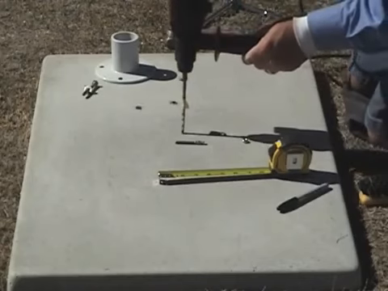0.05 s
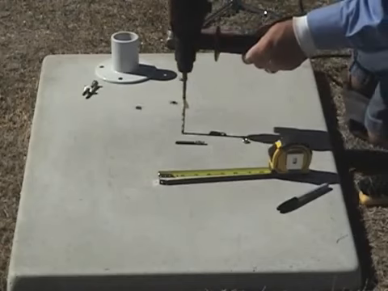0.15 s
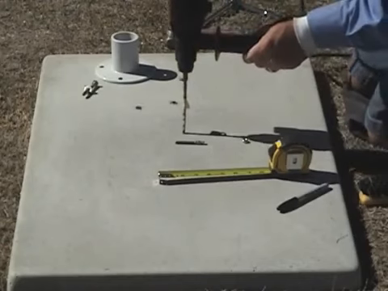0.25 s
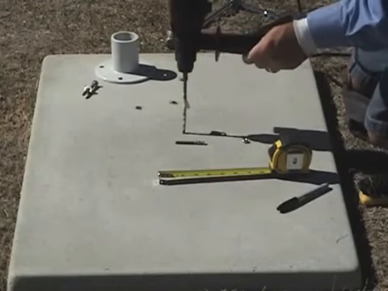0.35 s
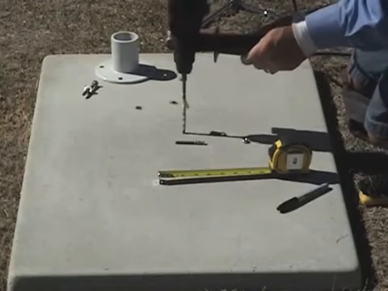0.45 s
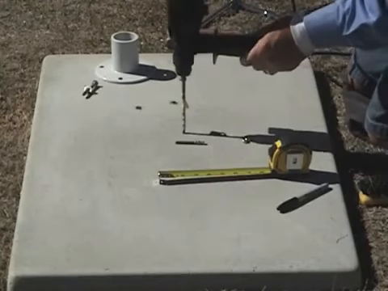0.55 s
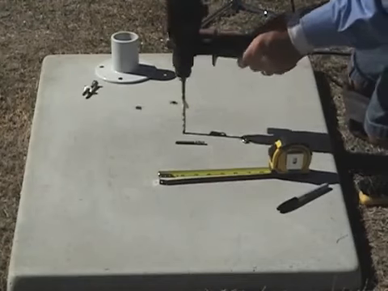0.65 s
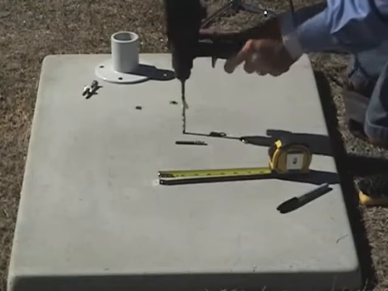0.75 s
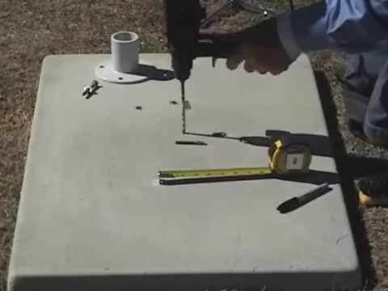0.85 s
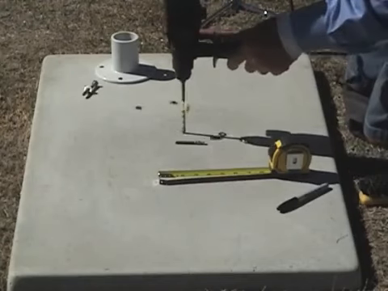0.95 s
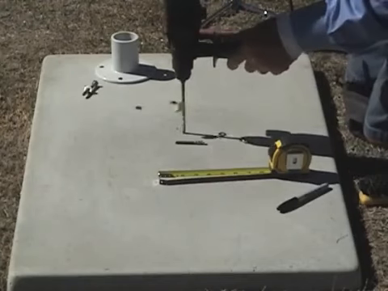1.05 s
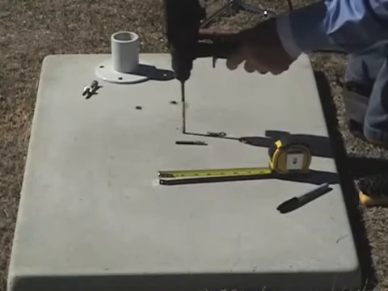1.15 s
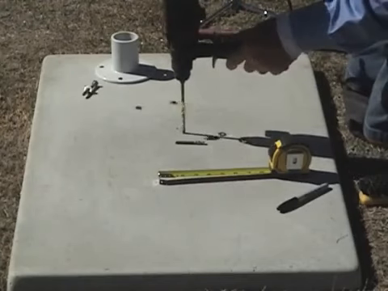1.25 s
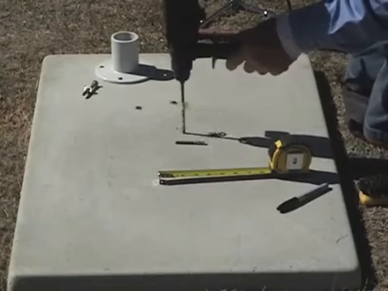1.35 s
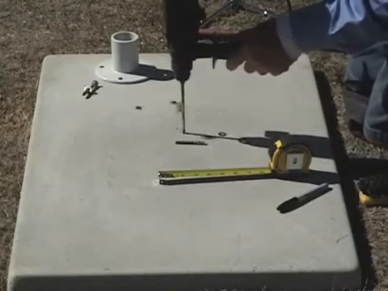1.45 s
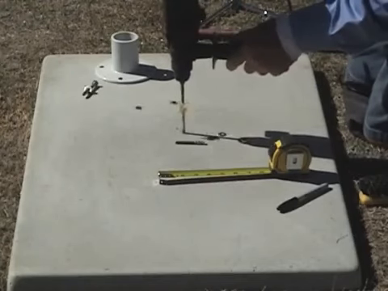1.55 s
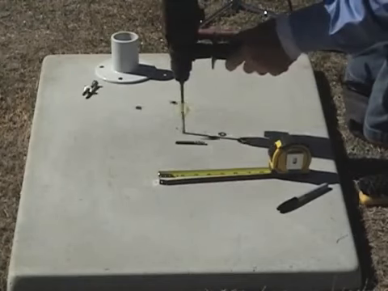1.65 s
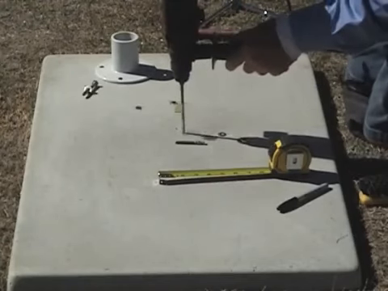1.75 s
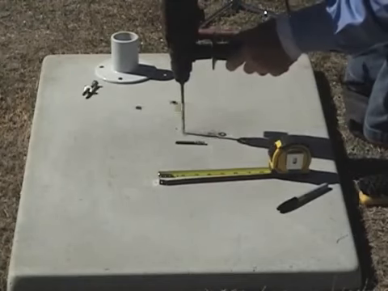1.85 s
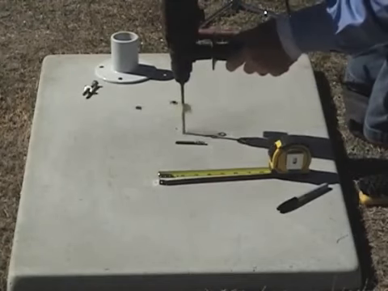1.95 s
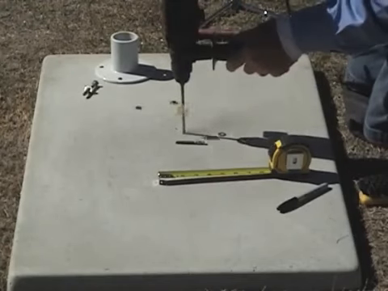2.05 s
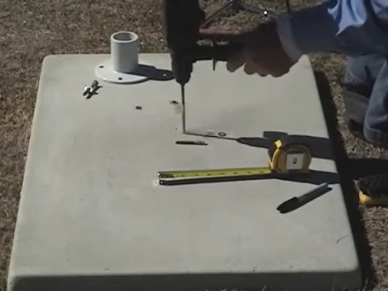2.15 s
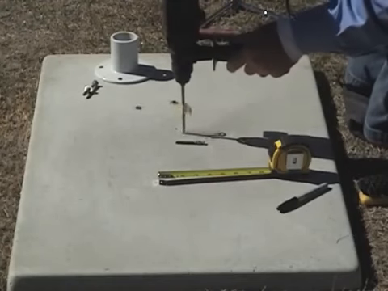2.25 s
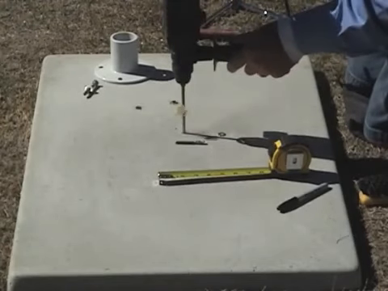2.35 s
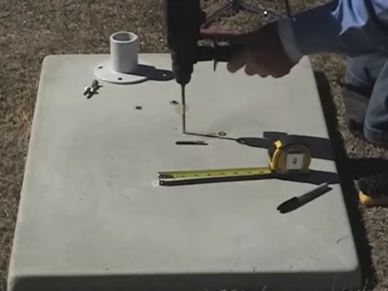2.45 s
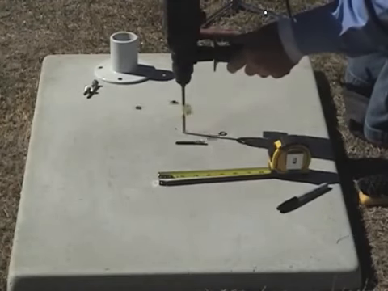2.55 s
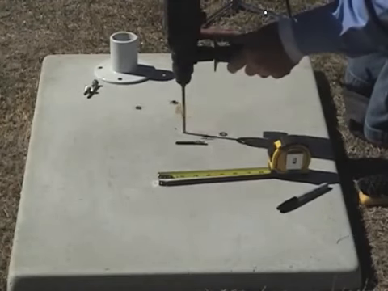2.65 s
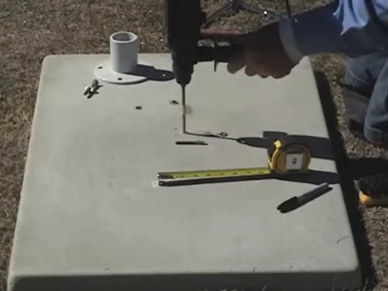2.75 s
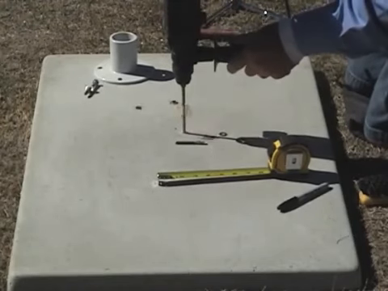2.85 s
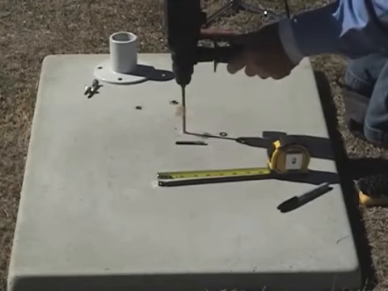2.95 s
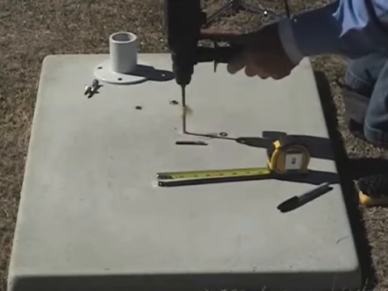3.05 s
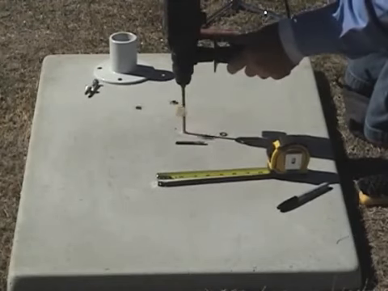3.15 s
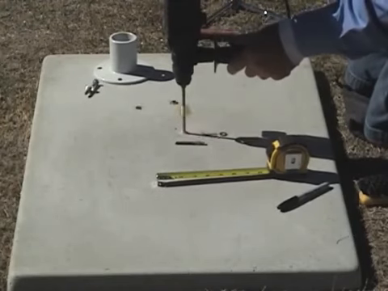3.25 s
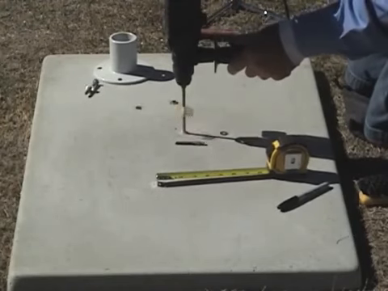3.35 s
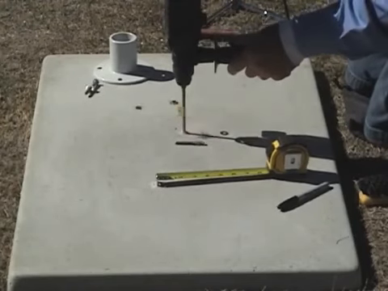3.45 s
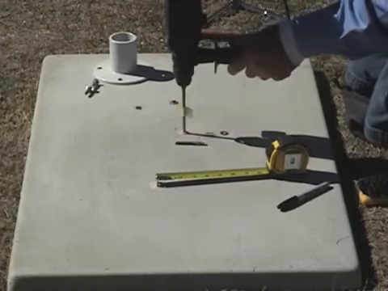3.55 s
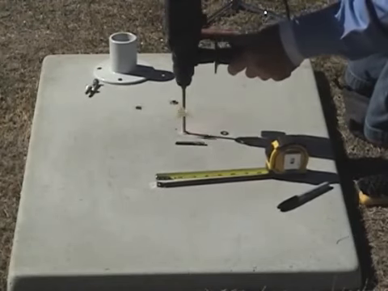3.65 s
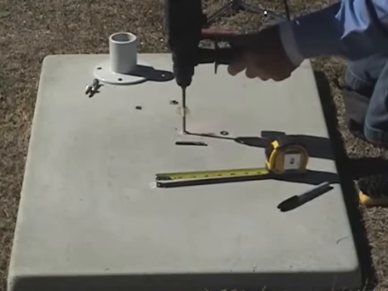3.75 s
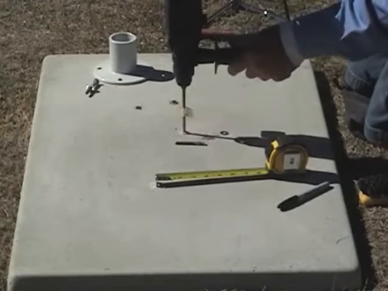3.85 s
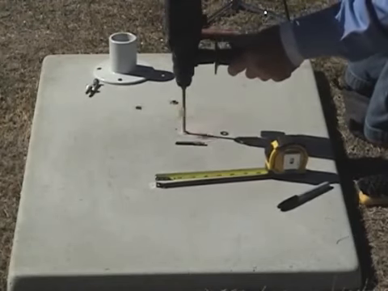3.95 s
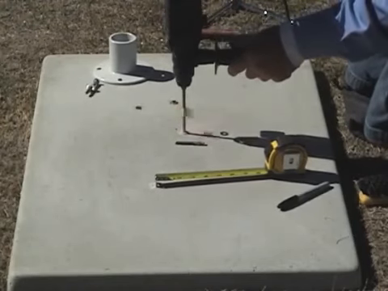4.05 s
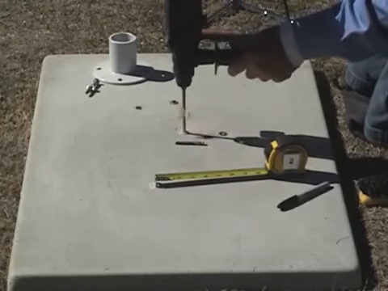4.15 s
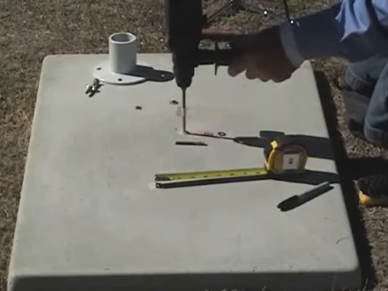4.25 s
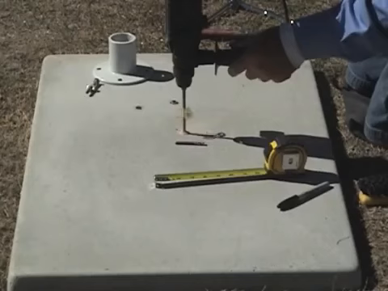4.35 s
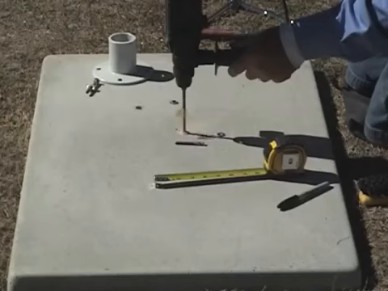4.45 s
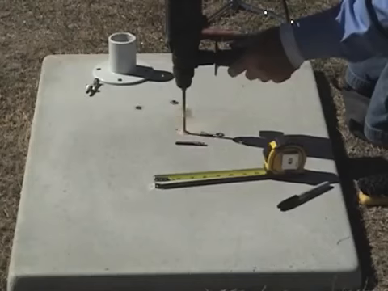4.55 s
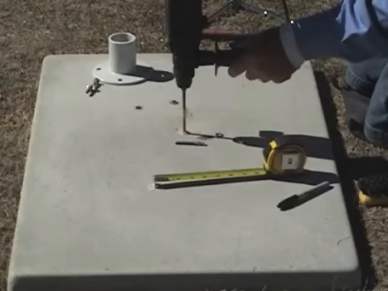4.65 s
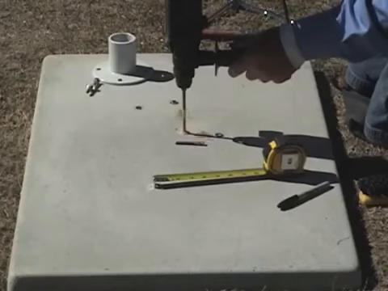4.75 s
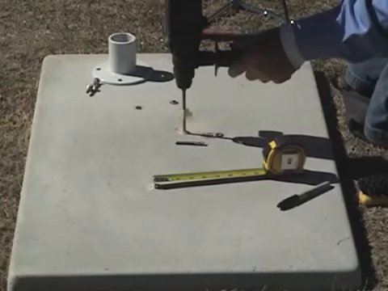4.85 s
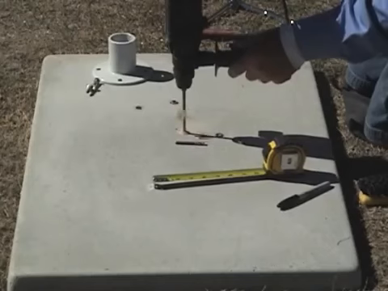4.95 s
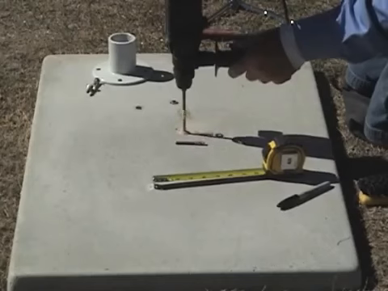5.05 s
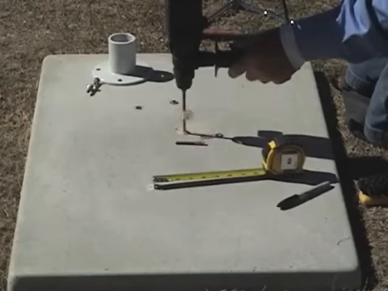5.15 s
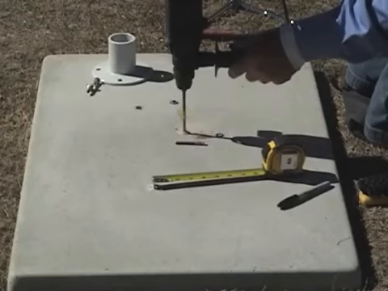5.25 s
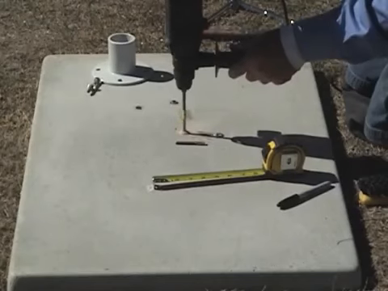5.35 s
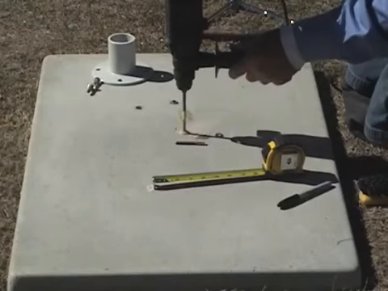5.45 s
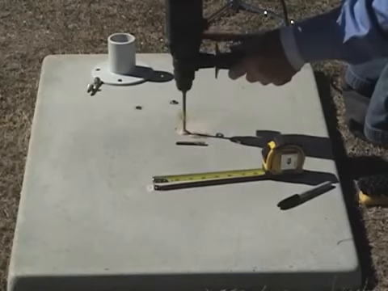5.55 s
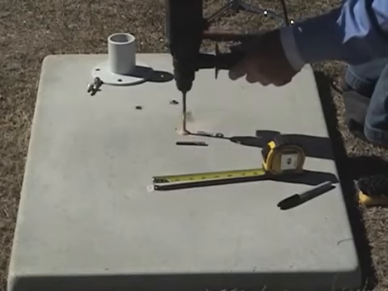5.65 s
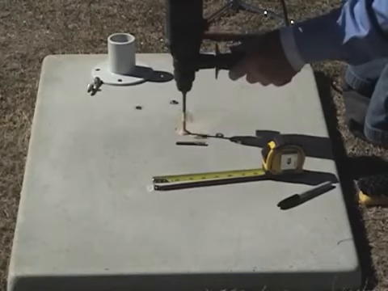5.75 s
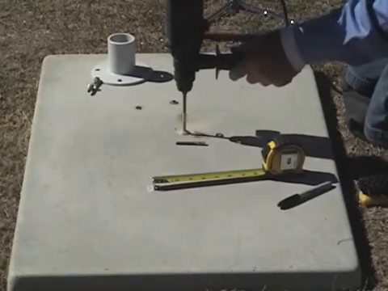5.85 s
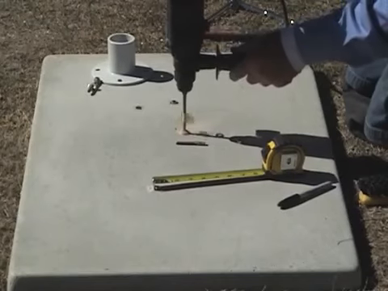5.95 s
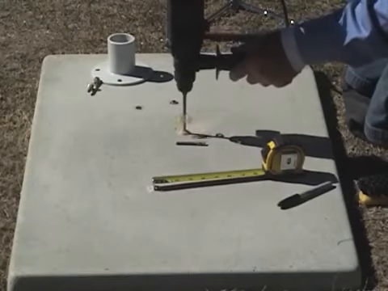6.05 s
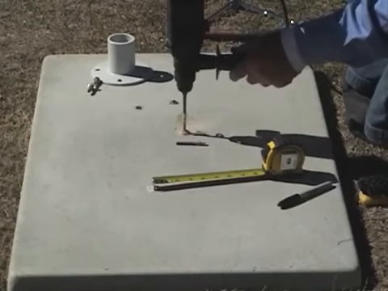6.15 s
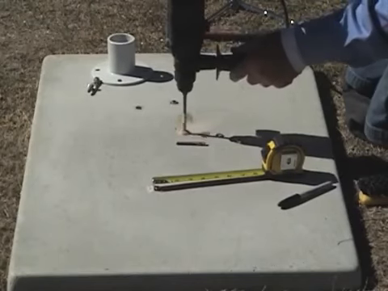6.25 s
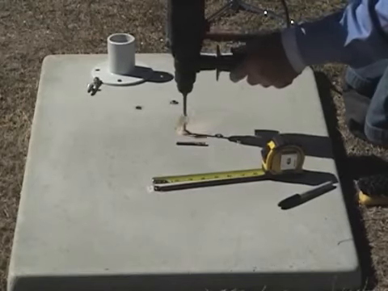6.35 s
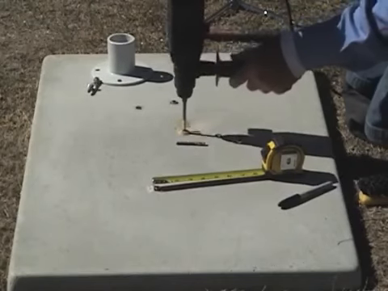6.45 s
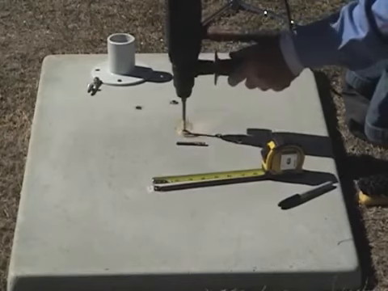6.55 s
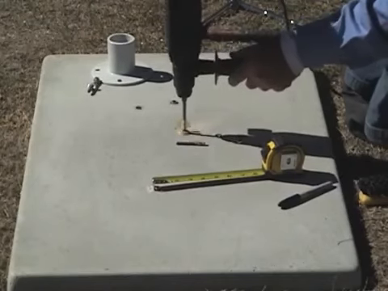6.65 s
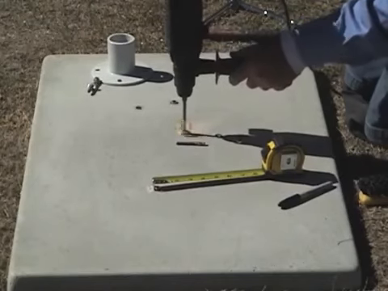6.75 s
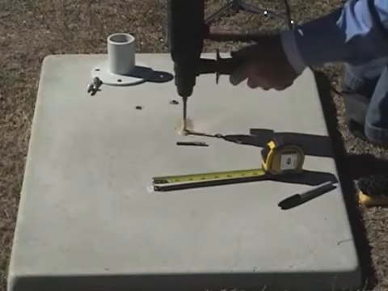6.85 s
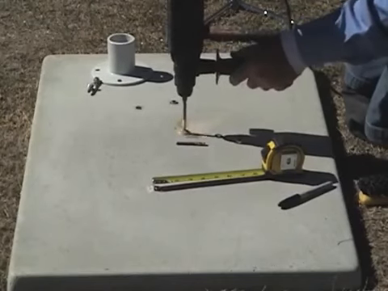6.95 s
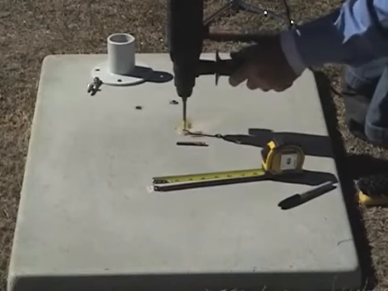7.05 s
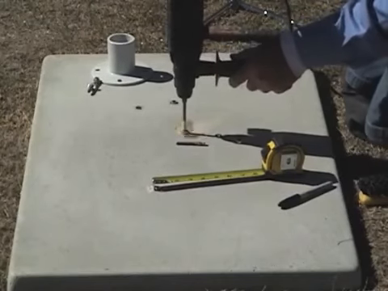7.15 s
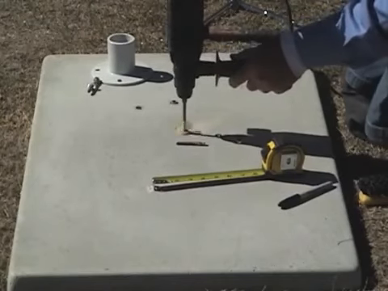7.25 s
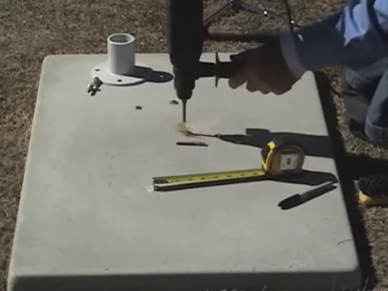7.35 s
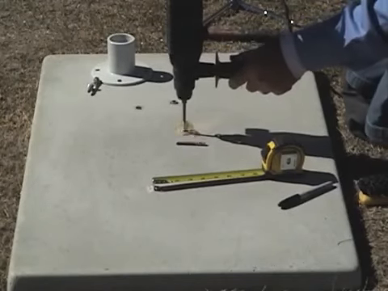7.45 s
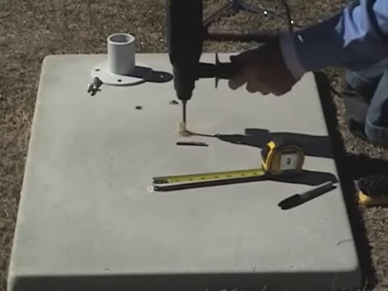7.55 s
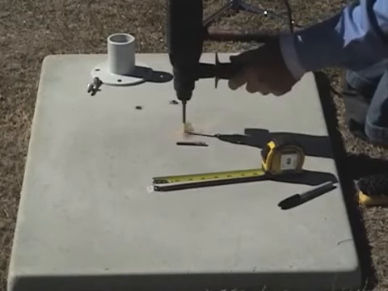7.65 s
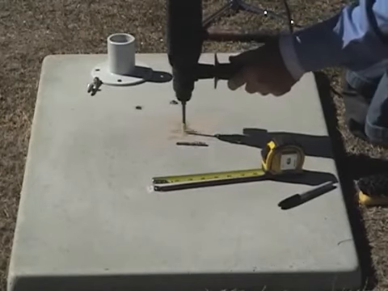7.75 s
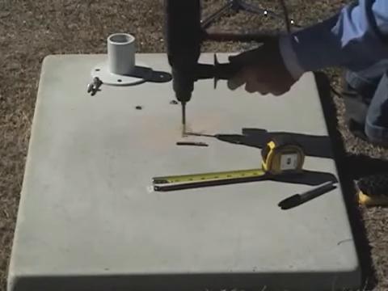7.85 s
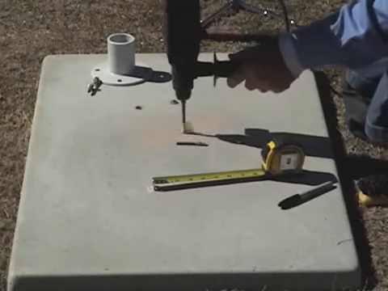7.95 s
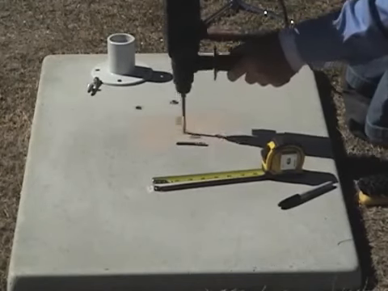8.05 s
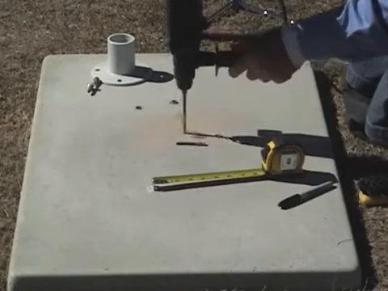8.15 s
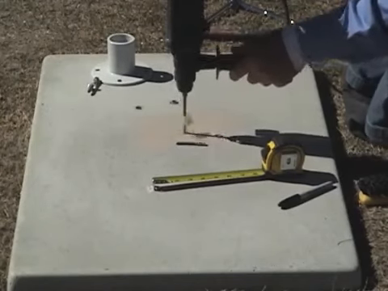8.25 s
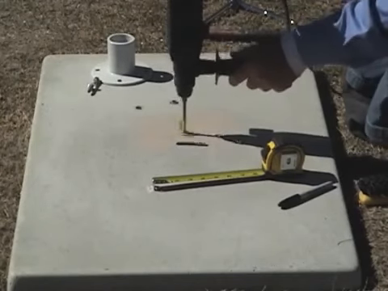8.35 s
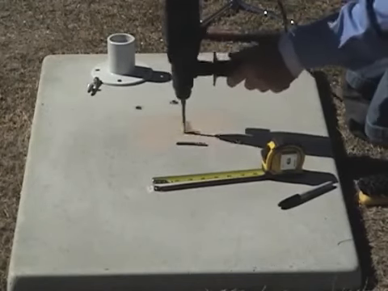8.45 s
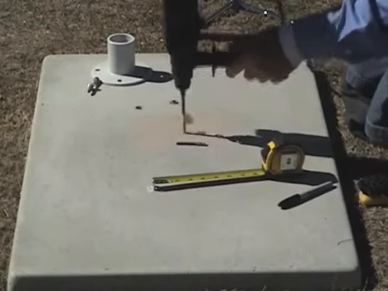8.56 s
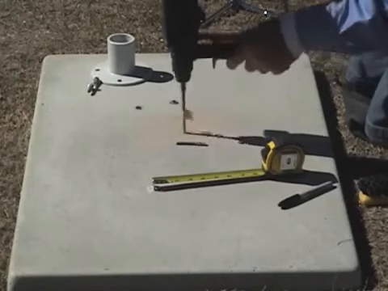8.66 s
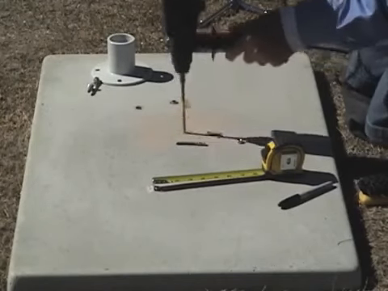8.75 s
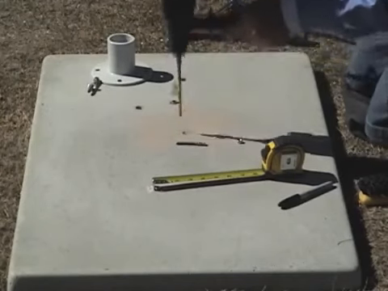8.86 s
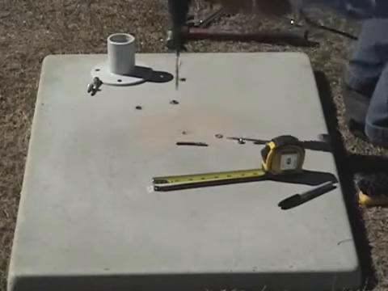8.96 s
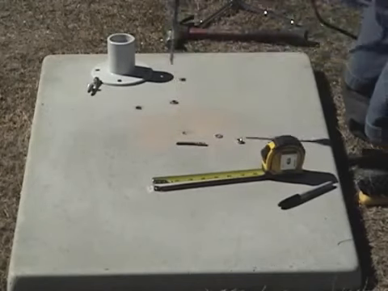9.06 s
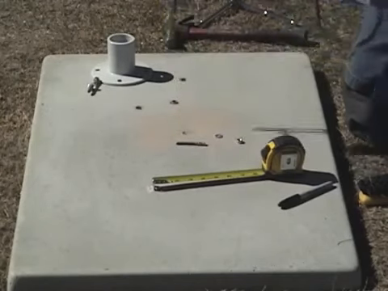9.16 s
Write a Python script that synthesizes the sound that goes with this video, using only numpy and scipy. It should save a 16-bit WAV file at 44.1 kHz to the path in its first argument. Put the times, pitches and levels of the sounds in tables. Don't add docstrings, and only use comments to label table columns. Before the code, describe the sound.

Quiet open air, a click, a few separate knocks, then harsh machine-gun hammering on ringing concrete, ending in a whirring, slowing motor.

```python
import sys
import numpy as np
from scipy import signal
from scipy.fft import rfft, irfft, next_fast_len
from scipy.io import wavfile
from scipy.ndimage import uniform_filter1d

SR = 44100
rng = np.random.default_rng(int(sys.argv[2]) if len(sys.argv) > 2 else 0)


def natural_amplitude(level_db):
    exponent = np.asarray(level_db, float) / 20
    return 10 ** exponent


def generate_wav(sig):
    pcm = np.round(np.clip(np.atleast_2d(sig).T, -1, 1) * 32767).astype(np.int16)
    wavfile.write(sys.argv[1], SR, pcm)


N = 406513
TIME = np.arange(N) / SR
OPPOSITE = np.array([[1], [-1]])

# (time [s], peak [dB], steel crack re peak [dB])
SINGLE_BLOWS = [
    (1.029, -29, -15),
    (1.093, -21, -15),
    (1.12, -5.5, -11),
    (1.187, -10.5, -13),
    (1.268, -15.5, -9),
]
# (time [s], peak [dB])
SET_DOWN = [
    (.105, -34.5),
    (.8855, -21.5),
    (0.8898, -32.5),
    (.902, -33),
    (.911, -34),
]
# (time [s], blow peak [dB], slab thrum re blow [dB])
PRESSURE = [(1.338, -7.5, -7), (1.375, -5, -7), (1.66, -3.5, -9), (1.88, -3.5, -1.5), (2.0, -4, -11),
            (2.35, -3.5, -2.5), (2.6, -2.5, -2), (3.36, -3, -8), (5.15, -3.5, -4.5), (6.5, -3.5, 0)]
# (start [s], end [s])
LIMPING_SPELLS = [
    (2.5, 3.55),
    (4.0, 5.08),
]
# (delay after the blow [ms], level [dB])
CHATTER = [(-3.5, -11), (-2, -8.5), (-0.94, -7), (.8, -3.5), (1.9, -8.5), (4, -9.5), (7.5, -14)]
# (frequency [Hz], t60 [s])
SLAB_THRUM = (158.25, 0.26)
# (frequency [Hz], level [dB], t60 [s])
DEEP_MODES = [(224, -24, .05), (437, -25.5, 0.027), (443.3, -8.5, 0.04), (666, -18, 0.069),
              (792.7, 5, 0.05), (955, -8, 0.028)]
HIGH_MODES = [(1067, -9, 0.016), (1300, -6, 0.037), (1387, -5, 0.033), (1673, -13, 0.03),
              (1838, -6.5, 0.038), (2044, -8.5, 0.027), (2307, -4, 0.013), (2462, -9.5, 0.014),
              (2606, -10, 0.024), (3420, -24.5, 0.014), (3870, -16, 0.012), (4153, -9, 0.011),
              (5500, -33, 0.0082)]
LOOSE_MODES = [(466, -7, .04), (817, 2, .07), (1309, -6, .07), (1411, -9, .06)]
# (frequency [Hz], level [dB])
RADIATION = [(150, -19.5), (230, -6), (306, -6), (385, 2), (460, 2), (540, -5.5), (615, -1), (850, 1),
             (1000, -15.5), (1200, -0.5)]
# (frequency [Hz], width [Hz], level [dB])
STEEL_MODES = [(6670, 260, 1), (7430, 720, 3.5), (8820, 460, 1.5)]

# (time [s], speed [teeth/s])
PICKUP = [
    (1.02, 4),
    (1.1, 14),
    (1.25, 14),
    (1.338, 28.8),
    (1.575, 28.8),
    (1.6, 35),
    (1.73, 47),
    (1.84, 53.3),
]
# (time [s], speed [teeth/s])
LOADED_SPEED = [(2.45, 74.9), (2.75, 76.2), (3.46, 77.4), (4.26, 77.3), (4.34, 76.8), (5.05, 76.9),
                (5.49, 75.2), (5.86, 74.6), (6.26, 75.5), (6.56, 74.6)]
ENGAGE_S, SEATED_S, LIFT_S, RELEASE_S = 1.338, 2.0, 6.56, 8.53
FREE_HZ = 88.4

# (time [s], level [dB])
WHIR = [(1.018, -85), (1.03, -41), (1.1, -28.5), (1.19, -30.5), (1.27, -37.5), (1.36, -23.5), (1.5, -24.5),
        (6.56, -25.5), (6.63, -26), (6.85, -21.5), (8.12, -21), (8.25, -20.5), (8.55, -22), (8.92, -28),
        (9.22, -31)]
# (frequency [Hz], width [Hz], level [dB])
HOUSING_MODES = [(688, 16, 3), (930, 140, 0), (1420, 120, -8), (1900, 200, 2), (2290, 100, -1),
                 (2970, 330, -2), (4400, 260, -3), (5560, 440, -12), (8060, 500, -15)]
# (frequency [Hz], density [dB/Hz])
HOUSING_WASH = [(120, -17), (283, -12), (680, -8), (1200, -9.5), (1930, -1.5), (2900, -5), (3700, -5),
                (4450, -11.5), (5200, -12), (10300, -24.5)]
# (time [s], level re whir [dB])
SQUEALS = [
    (6.46, -7),
    (8.27, -4),
    (8.47, -7),
    (8.83, -1),
]
# (time [s], level [dB], frequency [Hz], t60 [s])
SWITCH = (.8752, -30, 2600, .018)
# (frequency [Hz], side minus mid [dB])
ECHO_SPREAD = [(60, -9), (110, -44), (190, -66.5), (340, -41), (610, -21.5), (1090, -22.5), (1940, -18),
               (3460, -16.5), (6170, -24), (11000, -12)]
# (frequency [Hz], density [dB/Hz])
AIR = [(15, -46), (25, -35.5), (103, -3.5), (136, -5), (220, -5), (262, -15.5), (905, -11.5), (1700, -23),
       (2620, -20.5), (9730, -33), (10500, -39), (13600, -88.5), (22000, -120)]


def hammer():
    s, size, thrum_db, crack_db = blows()
    blow = clicks(s, size)
    push = blow.copy()
    for ms, db in CHATTER:
        late_s = (ms + .03 * rng.standard_normal(len(s))) / 1000
        scatter_db = rng.standard_normal(len(s))
        push += clicks(s + late_s, size * natural_amplitude(db + scatter_db))
    grit = fade(blow, 6.1) * rng.standard_normal(N)
    push += natural_amplitude(-33) * grit
    touch_s, touch_db = np.transpose(SET_DOWN)
    tap = clicks(touch_s, natural_amplitude(touch_db))
    touch = cut(tap, 2600, "low") + natural_amplitude(6.5) * tap
    thrum = mode(clicks(s, size * natural_amplitude(thrum_db)) + natural_amplitude(-1.0) * touch, *SLAB_THRUM)
    slab = ring_slab(blow, push, touch)
    steel = crack_steel(s, size * natural_amplitude(crack_db), tap)
    return natural_amplitude(-7.0) * slab + natural_amplitude(-18.0) * cut(thrum, 130, "high") + natural_amplitude(-0.5) * steel


def blows():
    jitter_ms, limp_late_ms, scatter_db = .025, .25, .6
    even_share, limp_share = .045, .13
    deepest_s, muffle_db_per_s, clear_db_per_s, skate_db = 5.08, 4, 6.5, 5
    db, thrum_db = columns(PRESSURE)
    on = (TIME >= ENGAGE_S) & (TIME < LIFT_S)
    turn = np.cumsum(speed()[on]) / SR
    count = np.arange(int(turn[-1]) + 1)
    s = np.interp(count, turn, TIME[on])
    i = (s * SR).astype(int)
    chance = rng.standard_normal((3, len(s)))
    limping = sum(spell(a, b, .15) for a, b in LIMPING_SPELLS)
    limp = (even_share + (limp_share - even_share) * limping)[i] * (-1.) ** count
    crack_db = -12 - muffle_db_per_s * np.clip(s - SEATED_S, 0, deepest_s - SEATED_S)
    crack_db += clear_db_per_s * np.maximum(s - deepest_s, 0)
    crack_db += (s < SEATED_S) * skate_db * (chance[2] - .5)
    s = s + (jitter_ms * chance[0] + limp_late_ms * limp) / 1000
    size = natural_amplitude(db[i] + scatter_db * chance[1]) * (1 - limp)
    once_s, once_db, once_crack = np.transpose(SINGLE_BLOWS)
    once_thrum = np.full(len(once_s), -7.0)
    return (np.r_[once_s, s], np.r_[natural_amplitude(once_db), size],
            np.r_[once_thrum, thrum_db[i]], np.r_[once_crack, crack_db])


def ring_slab(blow, push, touch):
    loose = spell(-1, SEATED_S, .4)
    free_push = (blow + .5 * touch) * loose
    deep_push = (1 - .7 * loose) * (0.79 * blow + 0.24 * push + touch)
    free = sum(natural_amplitude(db) * mode(free_push, hz, t60) for hz, db, t60 in LOOSE_MODES)
    deep = sum(natural_amplitude(db) * mode(deep_push, hz, t60) for hz, db, t60 in DEEP_MODES)
    high = sum(natural_amplitude(db) * mode(push + touch, hz, t60) for hz, db, t60 in HIGH_MODES)
    return -colour(natural_amplitude(-3.0) * deep + cut(high, 670, "high") + natural_amplitude(-2.0) * free, RADIATION)


def crack_steel(s, size, tap):
    scatter_db = 2.0 * rng.standard_normal(len(s))
    crack = clicks(s - 1.6 / 1000, size * natural_amplitude(scatter_db))
    burst = fade(crack + natural_amplitude(-20.0) * tap, 4.4) * rng.standard_normal(N)
    return sum(natural_amplitude(db) * band(burst, hz, width) for hz, width, db in STEEL_MODES)


def speed():
    full_s, full_hz = PICKUP[-1]
    lag_hz = settle(full_s, LOADED_SPEED[0][1] - full_hz, 0, .125)
    loaded = columns(LOADED_SPEED)[0] - lag_hz
    free = settle(LIFT_S, LOADED_SPEED[-1][1], FREE_HZ, .2)
    coast = settle(RELEASE_S, FREE_HZ, 21, .45)
    stages = [TIME < full_s, TIME < LIFT_S, TIME < RELEASE_S]
    return np.select(stages, [columns(PICKUP)[0], loaded, free], coast)


def settle(s, hz, goal, tau):
    return goal + (hz - goal) * np.exp(-np.maximum(TIME - s, 0) / tau)


def motor():
    hz, free = speed(), spell(LIFT_S, N / SR + 1, 0.51)
    slowed = np.log2(hz / FREE_HZ) * (TIME > RELEASE_S)
    level_db, = columns(WHIR)
    low_db = -3 - 4 * free
    hiss_db = -9 + 4.5 * free + 2.5 * slowed
    squeal_db = -24 + 8 * free
    whine_db = -30 + 14.5 * free - 4.5 * slowed
    turn = 2 * np.pi * np.cumsum(hz) / SR
    beat = 1 + 0.17 * np.cos(turn) + 0.17 * np.cos(2 * turn + 2.0)
    beat += 0.26 * np.cos(4 * turn)
    uneven = natural_amplitude(2.2 * np.minimum(rng.exponential(size=N), 5))
    ticks = rng.standard_normal(N) * uneven * beat * natural_amplitude(.8 * walk(18))
    ring = sum(natural_amplitude(db) * band(ticks, f, width) * natural_amplitude(1.4 * walk(9)) for f, width, db in HOUSING_MODES)
    whir = unit(colour(ticks, HOUSING_WASH)) + unit(ring)
    low = cut(cut(whir, 1250, "low"), 330, "high")
    middle = cut(cut(whir, 1250, "high"), 5500, "low")
    hiss = cut(whir, 5500, "high")
    thrum = unit(mode(ticks, *SLAB_THRUM))
    noise = unit(middle) + natural_amplitude(low_db) * unit(low) + natural_amplitude(hiss_db) * unit(hiss) + natural_amplitude(-28.5) * thrum
    return natural_amplitude(level_db) * (noise + bearing(ticks, squeal_db) + gears(turn, whine_db))


def bearing(ticks, squeal_db):
    squeal = band(band(ticks[::-1], 4270, 300), 4270, 300)
    bursts = sum(natural_amplitude(db) * np.exp(-((TIME - s) / .07) ** 2) for s, db in SQUEALS)
    return (natural_amplitude(squeal_db) + bursts) * unit(squeal)


def gears(turn, whine_db):
    whine = np.sin(26 * turn + 1.25 * walk(80)) * natural_amplitude(whine_db + 4 * walk(14))
    return whine + 1.8 * band(whine, 960, 80)


def trigger():
    s, db, hz, t60 = SWITCH
    return mode(clicks([s], natural_amplitude(db)), hz, t60)


def handling():
    load, = columns([(.8, 0.17), (1.3, 0.47), (2.4, 1), (6.5, 0.82), (6.7, 0.16)])
    mid, side, shake = (unit(cut(rng.standard_normal(N), hz, "low")) for hz in (100, 100, 340))
    low = natural_amplitude(1.4 * walk(7)) * (mid + natural_amplitude(-14.0) * side * OPPOSITE)
    return natural_amplitude(-50.0) * load * (low + natural_amplitude(11.5) * shake)


def outdoors():
    mid, side = (unit(colour(rng.standard_normal(N), AIR)) * natural_amplitude(0.5 * walk(1.0)) for _ in range(2))
    shaken_db = 5 * spell(ENGAGE_S, LIFT_S, 0.15)
    return natural_amplitude(-51.5 + shaken_db) * (mid + natural_amplitude(-6.0) * side * OPPOSITE)


def unit(x):
    return x / np.sqrt(np.mean(x ** 2))


def columns(rows):
    s, *values = np.transpose(rows)
    return [np.interp(TIME, s, v) for v in values]


def spell(start_s, end_s, edge_s):
    return np.clip(np.minimum(TIME - start_s, end_s - TIME) / edge_s + .5, 0, 1)


def colour(x, points):
    hz, db = np.transpose(points)
    size = next_fast_len(N + SR // 4)
    f = np.maximum(np.arange(size // 2 + 1) * SR / size, 1)
    gain = natural_amplitude(np.interp(np.log(f), np.log(hz), db))
    return irfft(rfft(x, size) * gain, size)[:N]


def band(x, hz, width_hz):
    return signal.lfilter(*signal.iirpeak(hz, hz / width_hz, SR), x)


def cut(x, hz, kind):
    return signal.sosfilt(signal.butter(4, hz, kind, fs=SR, output="sos"), x)


def mode(x, hz, t60):
    pole = np.exp(2j * np.pi * hz / SR - np.log(1000) / (t60 * SR))
    return signal.lfilter([1], [1, -pole], x).imag


def fade(x, ms):
    return signal.lfilter([1], [1, -np.exp(-1000 / (ms * SR))], x)


def clicks(s, size):
    place, out = np.asarray(s) * SR, np.zeros(N)
    i = place.astype(int)
    np.add.at(out, i, size * (1 - place + i))
    np.add.at(out, i + 1, size * (place - i))
    return out


def walk(rate):
    k = int(SR / rate)
    steps = np.repeat(rng.standard_normal(N // k + 1), k)
    return unit(uniform_filter1d(uniform_filter1d(steps, k), k)[:N])


def scene():
    drill = hammer() + motor() + trigger()
    lag = np.arange(int(.05 * SR)) / SR
    smear = rng.standard_normal((2, len(lag))) * np.exp(-lag / 0.008)
    echo, side = (signal.fftconvolve(drill, h / np.linalg.norm(h))[:N] for h in smear)
    side = colour(side, ECHO_SPREAD) * natural_amplitude(1.8 * walk(30)) + 0.0059 * drill
    return drill + natural_amplitude(-15) * echo + side * OPPOSITE + handling() + outdoors()


def low_pass(x):
    return signal.sosfilt(signal.butter(12, 11620, fs=SR, output="sos"), x)


def record(dry):
    soft = np.tanh(1.1 * dry) / 1.1
    mix = signal.sosfilt(signal.ellip(10, .2, 70, 10350, fs=SR, output="sos"), soft)
    return low_pass(mix)


dry = scene()
out = record(dry)
generate_wav(out)
```